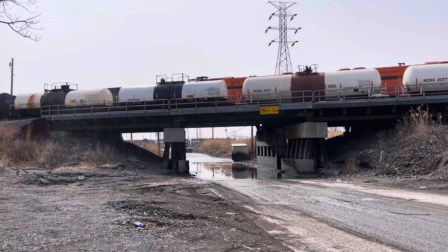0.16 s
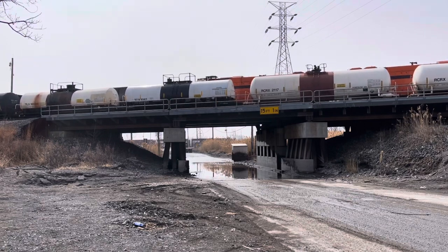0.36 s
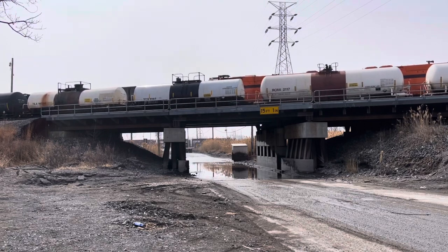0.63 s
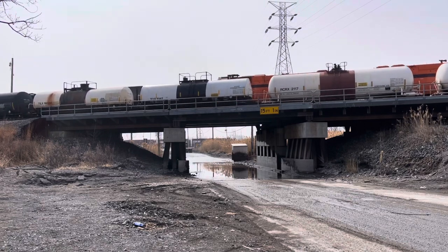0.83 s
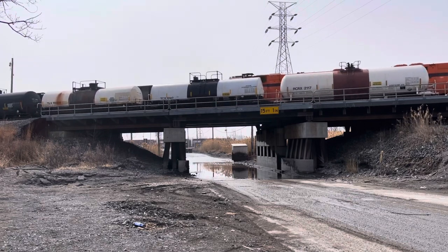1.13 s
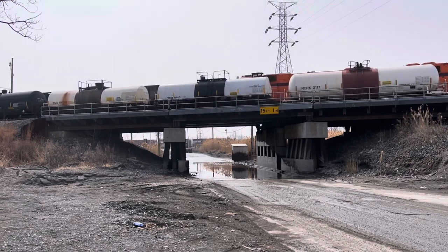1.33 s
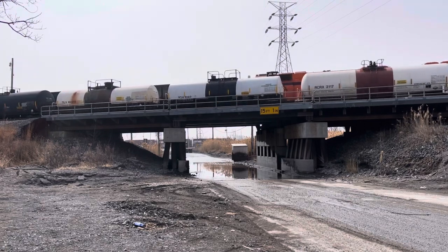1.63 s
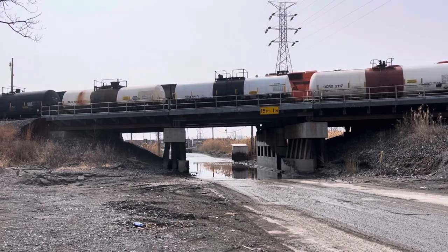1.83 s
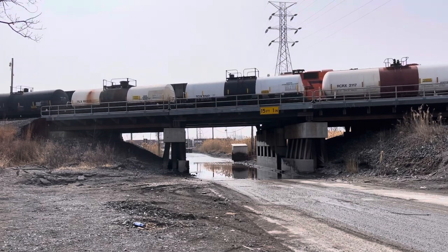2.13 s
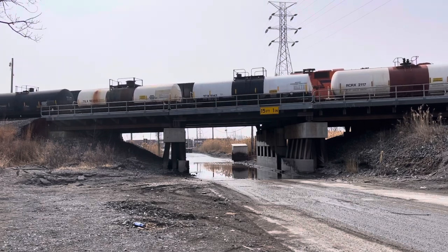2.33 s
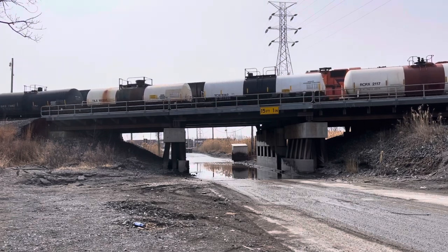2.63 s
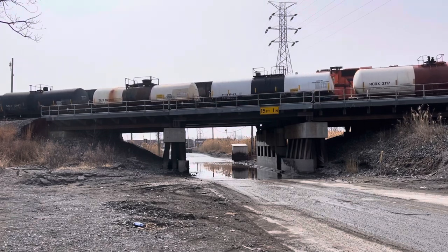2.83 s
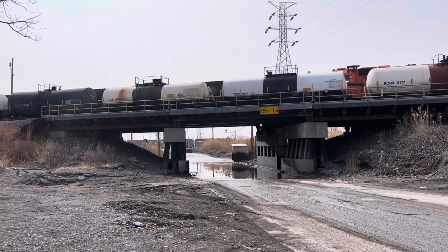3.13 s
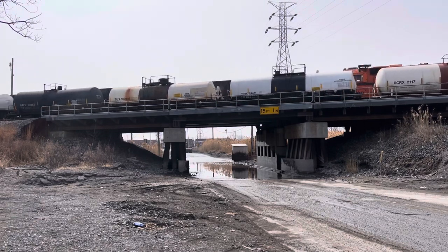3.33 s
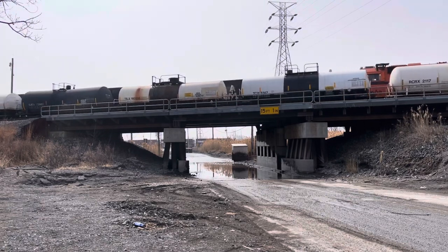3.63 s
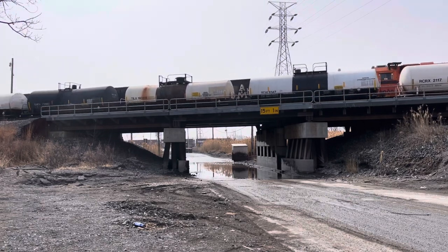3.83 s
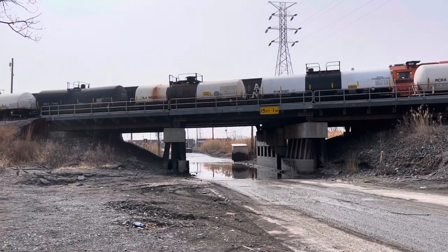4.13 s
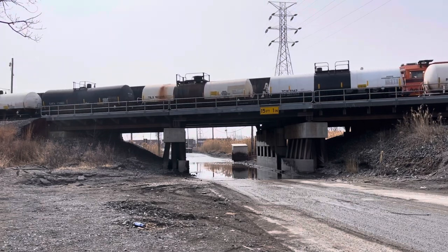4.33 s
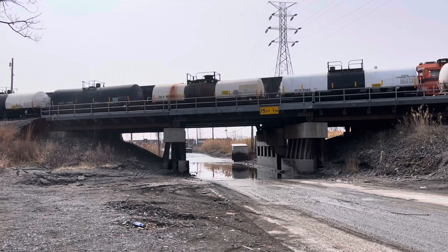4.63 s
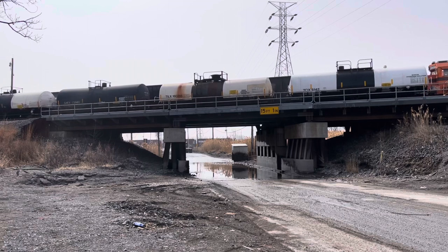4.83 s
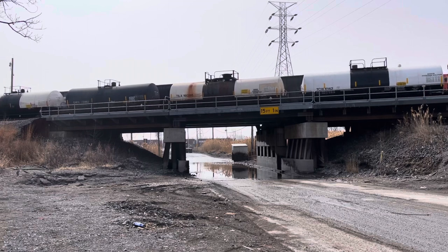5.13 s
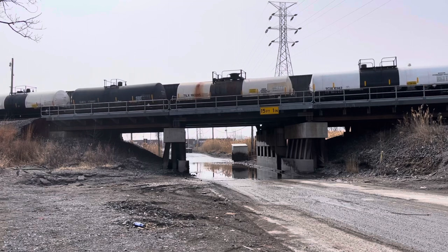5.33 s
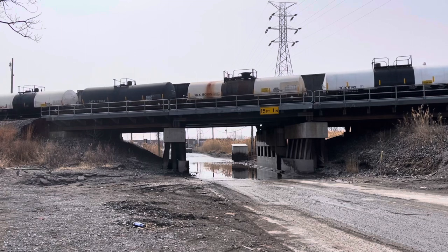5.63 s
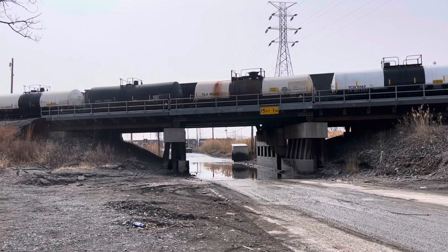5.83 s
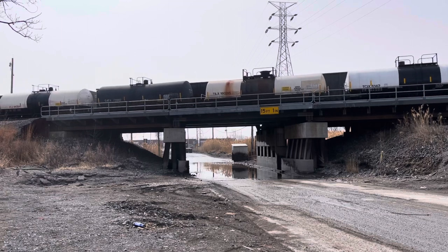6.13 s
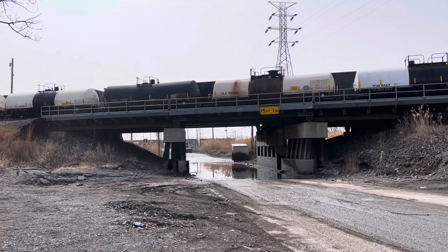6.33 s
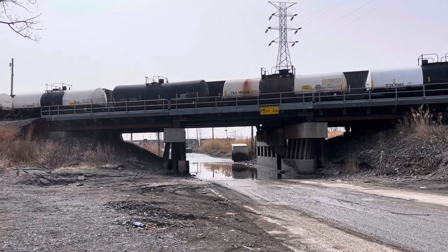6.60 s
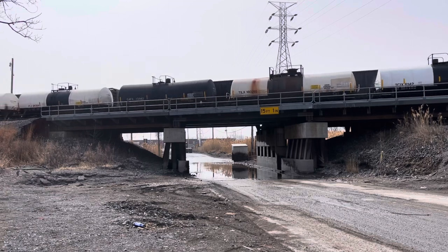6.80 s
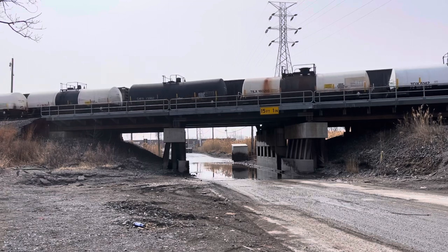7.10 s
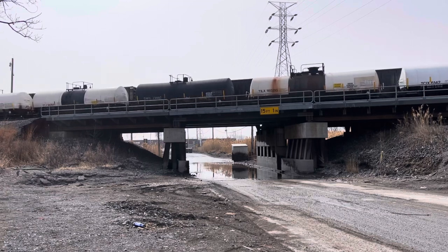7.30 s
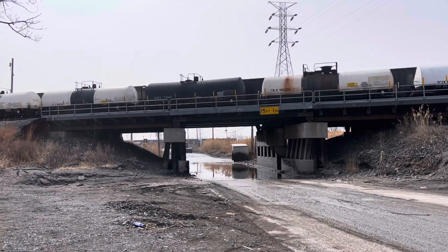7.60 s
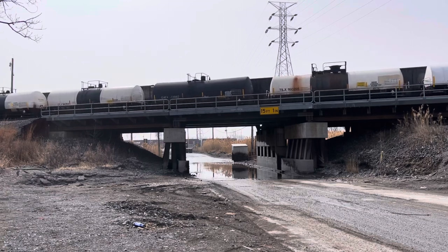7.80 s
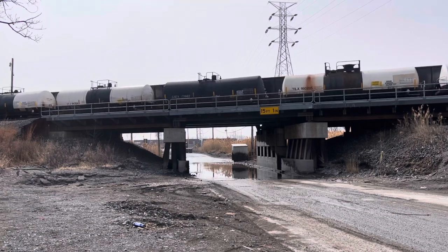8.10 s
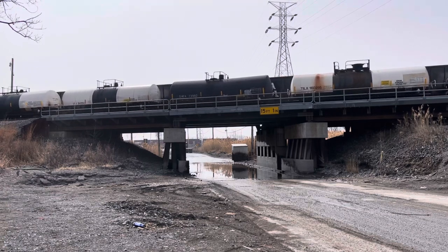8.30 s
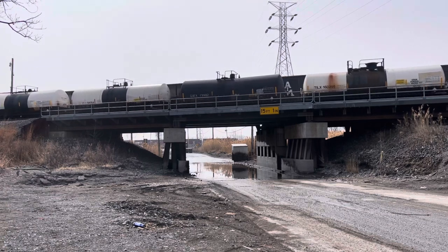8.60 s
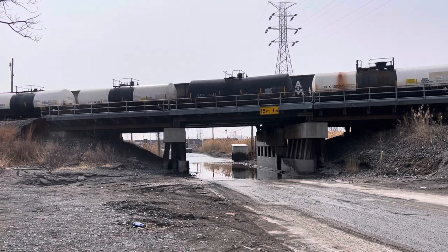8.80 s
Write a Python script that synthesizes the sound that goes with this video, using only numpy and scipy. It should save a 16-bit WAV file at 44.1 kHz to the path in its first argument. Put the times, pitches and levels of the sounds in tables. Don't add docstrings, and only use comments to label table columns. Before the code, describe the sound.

A continuous, bass-heavy train passage in open air, heard from the ground near a steel bridge. At 0 s two diesel locomotives, roughly 77 m away and slightly right, throttle down: their low buzzing notes sag until about 2 s, with thin gear whines fading, then hunt up and down until around 4 s. From there they hold nearly the same pitch, around 96 Hz, throbbing and beating slowly. Broad exhaust and fan roar surges gently at 0, 2.2, 4.6 and 6.1 s, growing duller and farther off. Girders rumble throughout, heavier at 0, 5, 6.4, 7.2 and from 8.4 s to the end. Above lies quieter wheel hiss with loose ironwork and faint ring, swelling near 2.1, 2.9, 3.9, 6.6 and 7.5 s. Two tiny dry snaps come at 7.45 s, a sharper one at 8.06 s. It ends at about 9 s, still rolling.

```python
import sys
import numpy as np
from scipy import signal
from scipy.fft import rfft, irfft
from scipy.io import wavfile

SR = 44100
rng = np.random.default_rng(int(sys.argv[2]) if len(sys.argv) > 2 else 0)


def transcribe(signal):
    frames = np.atleast_2d(signal).T
    limited = np.clip(frames, -1, 1)
    pcm = np.round(limited * 32767).astype(np.int16)
    wavfile.write(sys.argv[1], SR, pcm)


def gain_from_db(level_db):
    decades = np.asarray(level_db, float) / 20
    return 10 ** decades


N = 394694
HZ = np.fft.rfftfreq(N, 1 / SR)

# [t/s, crank speed/(turns/s), firing note level/dB]
LEAD_SPEED = [(0.0, 13.925, -17.1), (0.6, 13.199, -19.3), (0.9, 12.966, -26.7), (1.2, 12.719, -28.7),
              (1.6, 12.235, -26.7), (2.0, 11.927, -26.0), (2.4, 11.957, -23.8), (2.8, 12.028, -26.0),
              (3.2, 12.159, -23.3), (3.6, 12.067, -20.2), (4.0, 12.026, -16.7), (4.5, 12.104, -13.4),
              (5.0, 12.085, -13.7), (5.7, 12.036, -14.9), (6.4, 12.084, -13.4), (7.2, 12.059, -12.6),
              (8.0, 12.016, -13.5), (8.95, 12.004, -14.9)]
TRAIL_SPEED = [(0.0, 13.89, -23.5), (0.6, 12.825, -20.5), (0.9, 12.328, -15.7), (1.2, 11.813, -14.7),
               (1.6, 11.546, -13.5), (2.0, 11.86, -13.4), (2.4, 12.219, -12.4), (2.8, 12.282, -10.8),
               (3.2, 12.046, -13.0), (3.6, 11.889, -11.7), (4.0, 11.952, -12.3), (4.5, 12.03, -15.0),
               (5.0, 11.976, -14.0), (5.7, 11.955, -16.0), (6.4, 11.957, -17.8), (7.2, 11.943, -19.9),
               (8.0, 11.922, -19.2), (8.95, 11.95, -18.7)]
# [t/s, order 7 level/dB, order 9 level/dB]
LEAD_UNEVEN = [(0, -35, -32), (0.9, -34, -29), (2, -37, -22), (2.8, -39, -29.5), (3.6, -39, -24.5),
               (7.2, -26.5, -26), (8.95, -26, -22.5)]
TRAIL_UNEVEN = [(0, -23.5, -29), (0.9, -23, -22.3), (2, -25, -22), (2.8, -28, -29.4), (3.6, -25, -24.5),
                (4.5, -27, -27), (8.95, -29, -28)]
LEAD_START = (.359, .155, -.214)
TRAIL_START = (-.486, -.454, -.527)
# [order/(cycles per turn), level at start/dB, level at end/dB]
LEAD_MINOR = [(4.04, -45.5, -50), (5.04, -36.5, -36.5), (5.8, -34, -38), (10.19, -30, -53),
              (11.1, -47, -39), (17.76, -48.5, -45), (35.3, -40, -53.5), (40.6, -36, -48)]
TRAIL_MINOR = [(3.77, -52, -39), (5.05, -44.5, -23.5), (5.84, -31, -46.5), (10.14, -41, -43.5),
               (10.96, -51.5, -42.5), (18.25, -45, -41.5), (28.6, -55.5, -83)]
# [order/(cycles per turn), from t/s, to t/s, first level/dB, last level/dB]
LEAD_WHINE = [
    (17, 0.15, 0.6, -31, -31),
    (79.2, -1, 1.45, -39, -41.5),
]
TRAIL_WHINE = [
    (71.6, -1, 0.65, -36, -39),
    (79.4, 1.45, 9.5, -44, -48.5),
]
WHINE_FADE_S = 0.12

# [t/s, left capsule lag/ms, ground echo delay/ms]
LEFT_LAG = [(0, 0.069, 1.65), (2, 0.16, 1.62), (4.5, 0.27, 1.544), (7, 0.29, 1.32), (8.95, 0.27, 1.32)]
# [f/Hz, level/dB]
ROAR_COLOUR = [(74, -45), (125, -2), (200, -0.5), (290, -3), (350, -9), (400, -5.5), (445, 1), (540, -5.5),
               (830, -13), (1070, -15.5), (1400, -16.5), (2000, -22), (2500, -30), (5000, -48.5)]
# [f/Hz, left minus right level/dB]
ROAR_BALANCE = [(200, 1.5), (600, -1.5), (1100, -2.5), (2500, 4.5)]
# [f/Hz, phase/radians]
ROAR_TURN = [(150, 0), (400, .45), (800, .3), (1500, -.4), (2200, -1.6), (2800, -2.5)]
# [t/s, level/dB, half-length/s, brightening/(dB per octave)]
SURGES = [
    (0, 2.5, 0.23, 0.5),
    (0.8, 0.5, .15, 0.1),
    (1.5, 0.1, 0.22, -0.6),
    (2.2, 0.7, 0.26, 1.2),
    (3.2, -0.9, .35, 1.8),
    (3.65, 0, 0.071, -0.5),
    (4.6, 1, 0.19, -1.5),
    (6.1, 1.2, .2, -0.3),
    (6.7, .3, .2, 1.7),
    (7.2, -0.5, 0.12, 0.2),
]
START_M, RECEDE_M_PER_S = 77, 5.1
ROAR_START_DB, AIR_DB_PER_OCTAVE_100M = -20, -4

# [f/Hz, width/Hz, level/dB]
GIRDERS = [(28, 27, -15.5), (45.3, 21, -6.5), (56.8, 8.7, 4), (72.4, 20, -7), (92.4, 30.3, -4),
           (126.6, 24, -10.5), (220, 21.4, -13.5)]
# [t/s, level/dB, half-length/s]
LOADS = [
    (0, 10.5, 0.15),
    (0.75, 2, 0.19),
    (1.5, 3, .1),
    (3.1, 2.9, 0.078),
    (4.55, 2.4, 0.15),
    (4.95, 6, .15),
    (6.4, 4.5, .35),
    (7.2, 5.3, .17),
    (8.4, 7, 0.17),
    (8.93, 10.3, 0.22),
]
RUMBLE_DB = -23.0

# [f/Hz, level/dB]
CAR_COLOUR = [(880, -23.5), (1500, -5.5), (1900, -2.5), (2300, 3.5), (2600, 3.5), (2950, 1), (4900, -5.5),
              (6300, -8), (7200, -10.5), (8500, -9.5), (10200, -10.5), (11000, -10.5), (11600, -25),
              (12200, -36)]
# [f/Hz, likeness of the two capsules/(0 to 1)]
CAR_LIKENESS = [(1500, .85), (2400, .85), (3500, .9), (5000, .5), (6400, .7), (7300, .55), (8300, .95),
                (11000, .93)]
# [f/Hz, phase by which left leads/radians]
CAR_LEAD = [(1500, .6), (2800, .9), (4300, .4), (5600, 1.1), (6400, .2), (7300, 1), (8100, .75), (8650, 0),
            (9050, -1.2), (10200, -3.14), (11100, -4.4), (11800, -6.28)]
# [f/Hz, left minus right level/dB]
CAR_BALANCE = [(1500, 2), (3000, 1), (4500, 2), (6400, 3.5), (8300, 0.2)]
# [t/s, hiss level/dB, half-length/s, brightness above 5 kHz/dB, wheel ring near 2.6 kHz/dB]
BOGIES = [(0, 1, 0.091, 2, 7.5), (0.55, 0.5, .1, 2.5, 3), (0.92, 0, 0.071, 4, 1.5), (1.65, 2, .2, 2, -0.5),
          (2.1, 5, 0.24, -3, -5), (2.9, 4, .15, -5.5, -5.5), (3.3, 1, .14, 2.5, 0.5),
          (3.9, 5, 0.3, -2.3, -5.5), (4.65, 2.5, 0.084, -0.8, -4), (6.1, -0.5, 0.28, 2.5, 3.5),
          (6.63, 5.5, 0.26, -0.5, -1), (7.48, 5, 0.12, 2, 2), (8.05, -0.1, 0.17, 1, 3),
          (8.62, 2, .1, 1.5, .6), (8.85, 2, .16, 2.5, 5)]
HISS_START_DB, HISS_SAG_DB_PER_S = -45.5, -0.4856

# [t/s, peak level/dB]
TICKS = [
    (7.446, -41),
    (7.49, -40),
    (8.0634, -33),
]


def rms_one(x):
    return x / np.sqrt(np.mean(x ** 2) + 1e-20)


def in_time(rows):
    s, *columns = np.transpose(rows)
    return [np.interp(np.arange(N) / SR, s, c) for c in columns]


def at_hz(points, hz):
    table_hz, values = np.array(points)[:, 0], np.array(points)[:, 1]
    return np.interp(np.log(hz + 1), np.log(table_hz), values)


def swells(rows):
    s, gain_db, half_s, *more = np.transpose(rows)
    t = np.arange(0, N + 100, 100) / SR
    bells = np.exp(-((t[:, None] - s) / np.maximum(half_s, 0.02)) ** 2)
    return in_time(np.c_[t, bells @ np.c_[(gain_db, *more)]])


def drift(rate):
    r = np.exp(-80 * np.pi * rate / SR)
    noise = rng.standard_normal(N // 40 + 2002)
    slow = signal.lfilter([1], [1, -2 * r, r * r], noise)[2000:]
    return np.interp(np.arange(N) / 40, np.arange(len(slow)), rms_one(slow))


def resonance(x, hz, width_hz):
    r = np.exp(-np.pi * width_hz / SR)
    poles = [1, -2 * r * np.cos(2 * np.pi * hz / SR), r * r]
    return signal.lfilter([(1 - r * r) / 2, 0, (r * r - 1) / 2], poles, x)


def bands(spectrum, centres, gains_db):
    out = 0
    for k, gain_db in enumerate(gains_db):
        share = at_hz(np.c_[centres, np.arange(len(centres)) == k], HZ)
        out = out + gain_from_db(gain_db) * irfft(spectrum * share, N)
    return out


def later(x, lag_ms):
    return np.interp(np.arange(N) - lag_ms * SR / 1000, np.arange(N), x)


def from_right(x, lag_ms):
    return np.array([later(x, lag_ms), x])


def engine(rows, uneven, starts, minor, whines):
    speed, firing_db = in_time(rows)
    below_db, above_db = in_time(uneven)
    turns = np.cumsum(speed) / SR
    out = np.zeros(N)
    for order, level_db, start in zip((7, 8, 9), (below_db, firing_db, above_db), starts):
        out += gain_from_db(level_db) * np.cos(2 * np.pi * (order * turns + start))
    for order, start_db, end_db in minor:
        wobble = 2 * np.pi * rng.random() + 0.054 * drift(3.5)
        level_db = np.linspace(start_db, end_db, N) + 2.7 * drift(1.7)
        out += gain_from_db(level_db) * np.cos(2 * np.pi * order * turns + wobble)
    for order, on_s, off_s, first_db, last_db in whines:
        level_db, = in_time([(on_s - WHINE_FADE_S, -90), (on_s, first_db),
                             (off_s, last_db), (off_s + WHINE_FADE_S, -90)])
        wobble = 0.55 * drift(3)
        out += gain_from_db(level_db + 1.5 * drift(1.2)) * np.cos(2 * np.pi * order * turns + wobble)
    return np.sqrt(2) * out, turns


def roar(turns, lag_ms, echo_ms):
    surge_db, brighter_db = swells(SURGES)
    far_m = START_M + RECEDE_M_PER_S * np.arange(N) / SR
    level_db = ROAR_START_DB - 20 * np.log10(far_m / START_M) + surge_db
    treble_db = AIR_DB_PER_OCTAVE_100M * far_m / 100 + brighter_db

    centres = np.geomspace(130, 2900, num=10)
    octaves = np.clip(np.log2(centres / 600), 0, 1.4)
    fade = octaves * (treble_db[:, None] - treble_db.mean())
    chuff = 0.3 * np.cos(2 * np.pi * turns)
    gains = [fade[:, k] + chuff + 1.37 * drift(6.1) for k in range(len(centres))]
    noise = rfft(rng.standard_normal((3, N)))
    heard = bands(noise * gain_from_db(at_hz(ROAR_COLOUR, HZ)), centres, gains)

    bounce = signal.lfilter([0.15], [1, -0.85], heard)
    direct, left, right = [x + 0.34 * later(b, echo_ms) for x, b in zip(heard, bounce)]
    scattered = 0.42 * signal.lfilter([1, -0.97], [1, -0.9], [left, right])
    balance = gain_from_db(at_hz(ROAR_BALANCE, HZ) * [[0.5], [-0.5]])
    tilt = balance * np.exp(1j * at_hz(ROAR_TURN, HZ) * [[-0.5], [0.5]])
    pair = from_right(direct, lag_ms) + scattered
    return gain_from_db(level_db) * rms_one(irfft(rfft(pair) * tilt, N))


def bridge():
    shake = rng.standard_normal(N)
    hum = np.zeros(N)
    for k, (hz, width, db) in enumerate(GIRDERS):
        mode = resonance(resonance(shake, hz, width), hz, 3.8 * width)
        hum += gain_from_db(db) * mode * (-1) ** k
    return gain_from_db(RUMBLE_DB + swells(LOADS)[0]) * rms_one(hum)


def cars():
    pass_db, bright_db, ring_db = swells(BOGIES)
    level_db = HISS_START_DB + HISS_SAG_DB_PER_S * np.arange(N) / SR + pass_db

    struck = rng.random(N) < 1500 * gain_from_db(5 * drift(9)) / SR
    rattle = struck * gain_from_db(3 * np.minimum(rng.exponential(1, N), 3))
    excite = rng.standard_normal((3, N))
    excite[0] += 0.2 * rms_one(rattle * excite[0])

    shared, left, right = rfft(excite)
    alike = at_hz(CAR_LIKENESS, HZ)
    turn = np.exp(0.5j * at_hz(CAR_LEAD, HZ)) * gain_from_db(at_hz(CAR_BALANCE, HZ) / 2)
    mixed = np.sqrt(alike) * shared + np.sqrt(1 - alike) * np.array([left, right])
    pair = np.array([turn, 1 / turn]) * mixed

    centres = np.array([1800, 2250, 2620, 3050, 3700, 5300, 7700, 11000])
    together = drift(10)
    brighter = bright_db - bright_db.mean()
    gains = [(hz > 5000) * brighter + 0.42 * together + 1.3 * drift(29) for hz in centres]
    for k, share in enumerate([0.55, 1.2, 0.45]):
        gains[1 + k] += share * (ring_db - ring_db.mean())
    return gain_from_db(level_db + 6.5) * rms_one(bands(pair * gain_from_db(at_hz(CAR_COLOUR, HZ)), centres, gains))


def snap():
    kick = np.full(N, 1e-18)
    tail = gain_from_db(-60 * np.arange(600) / SR / 0.008)
    for s, db in TICKS:
        start = round(s * SR)
        kick[start:start + 600] += gain_from_db(db) * tail * rng.standard_normal(600)
    modes = [(8000, 2700, 12.5), (11500, 2000, -10)]   # f/Hz, width/Hz, level/dB
    return sum(gain_from_db(db) * resonance(kick, hz, width) for hz, width, db in modes)


def scene():
    lag_ms, echo_ms = in_time(LEFT_LAG)
    lead, turns = engine(LEAD_SPEED, LEAD_UNEVEN, LEAD_START, LEAD_MINOR, LEAD_WHINE)
    trail, _ = engine(TRAIL_SPEED, TRAIL_UNEVEN, TRAIL_START, TRAIL_MINOR, TRAIL_WHINE)
    low = from_right(lead + trail + bridge(), 1.23 * lag_ms) * gain_from_db([[0.2], [-0.2]])
    snaps = from_right(snap(), 1000 / SR) * [[1], [0.75]]
    return low + roar(turns, lag_ms, echo_ms) + cars() + snaps


def low_pass(x):
    return signal.sosfilt(signal.butter(12, 12140, fs=SR, output="sos"), x)


def record(dry):
    heard = signal.sosfilt(signal.butter(1, 30, "high", fs=SR, output="sos"), dry)
    mix = 1.5 * np.tanh(heard / 1.45)
    return low_pass(mix)


dry = scene()
out = record(dry)
transcribe(out)
```